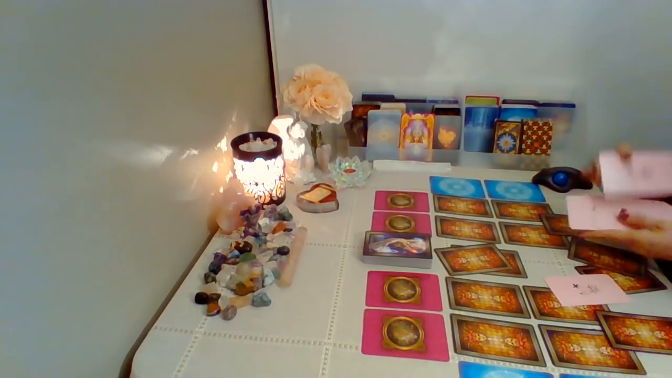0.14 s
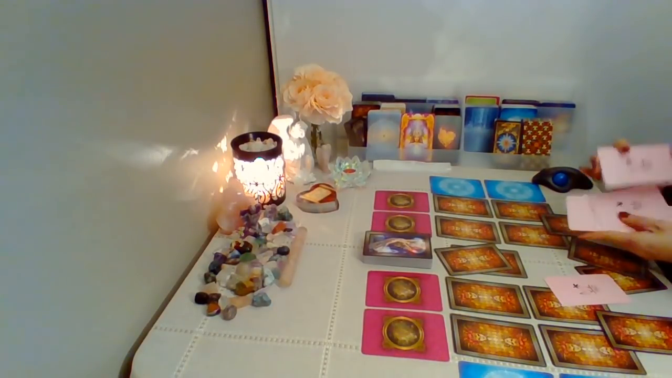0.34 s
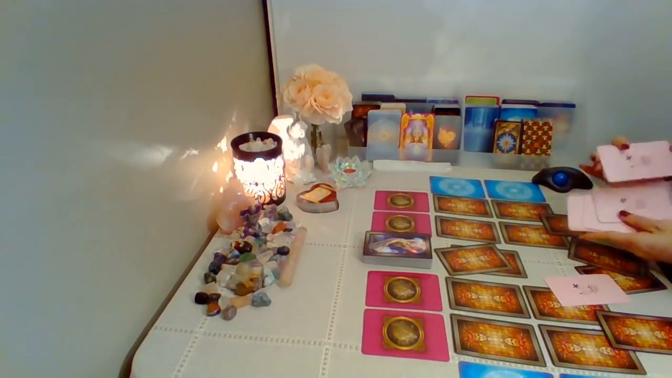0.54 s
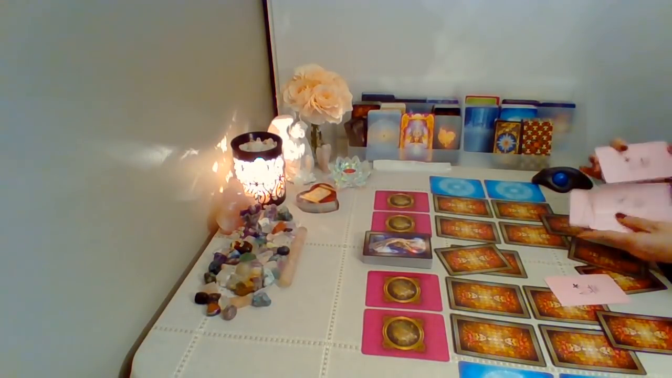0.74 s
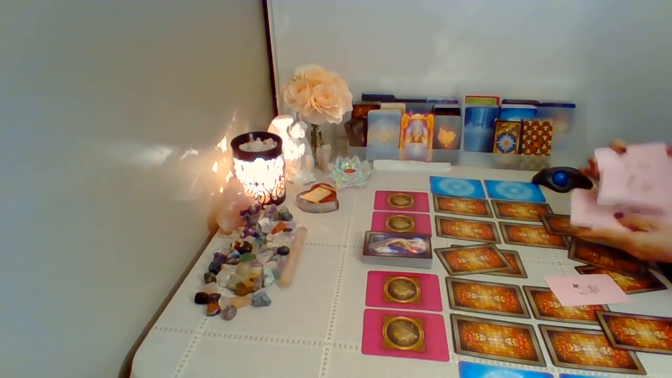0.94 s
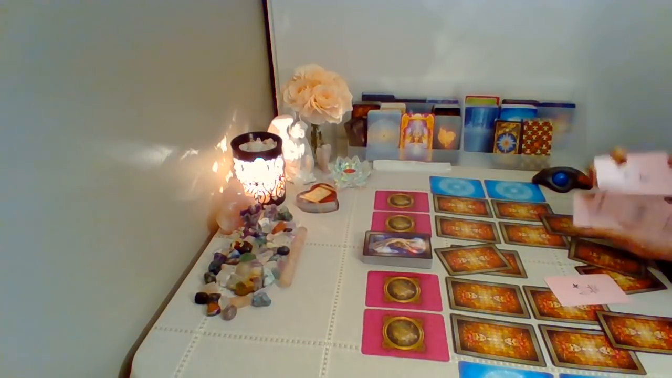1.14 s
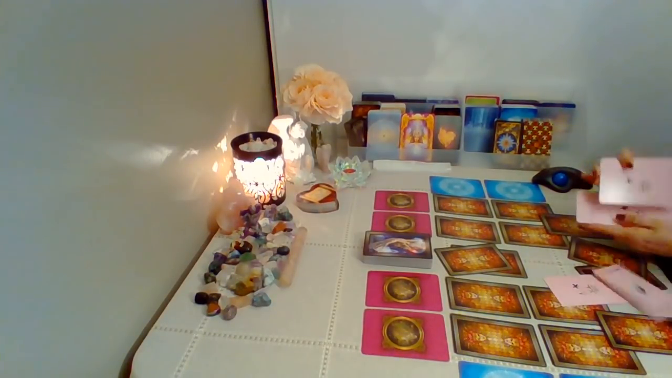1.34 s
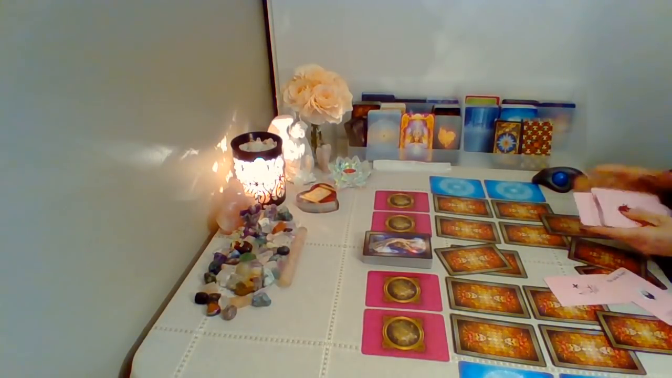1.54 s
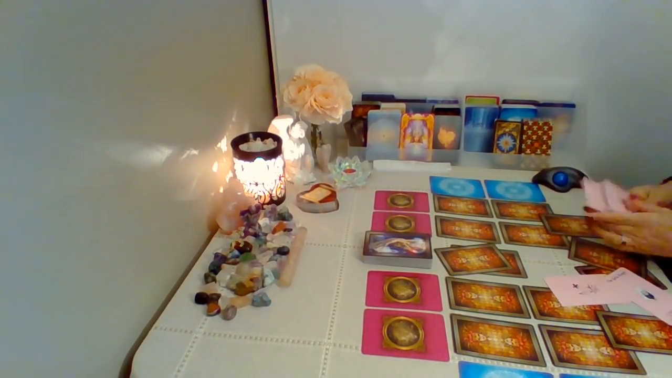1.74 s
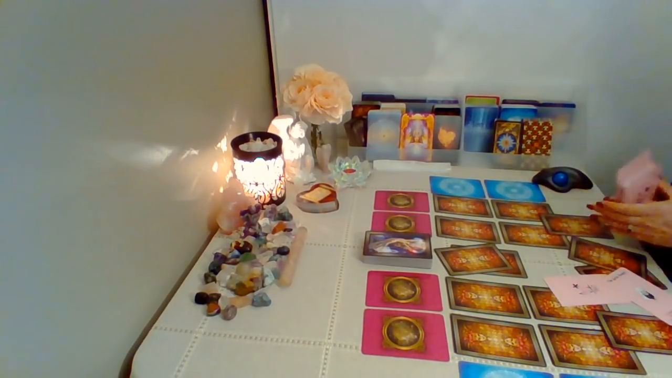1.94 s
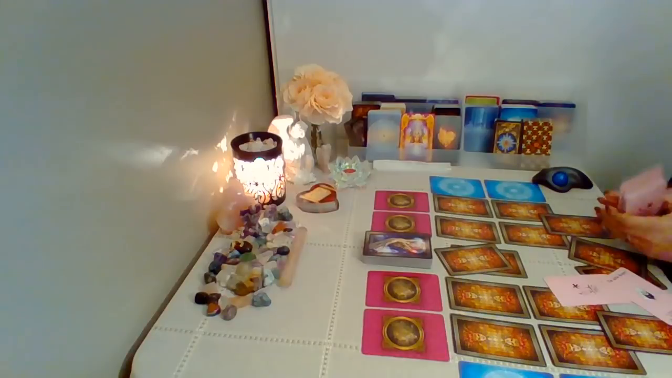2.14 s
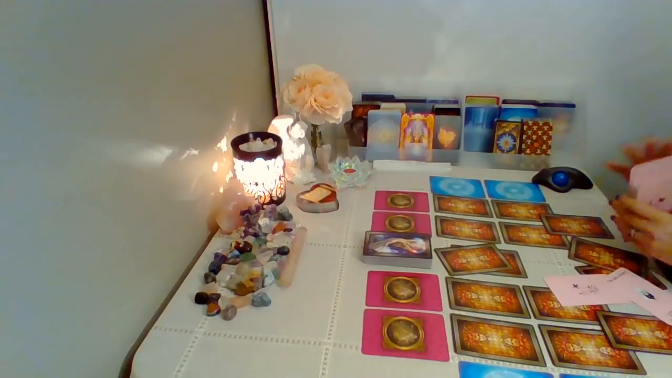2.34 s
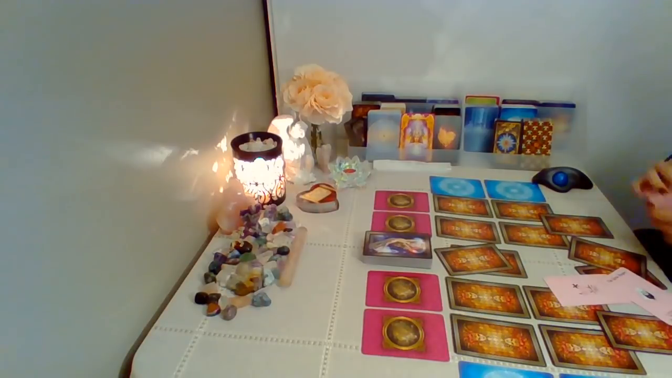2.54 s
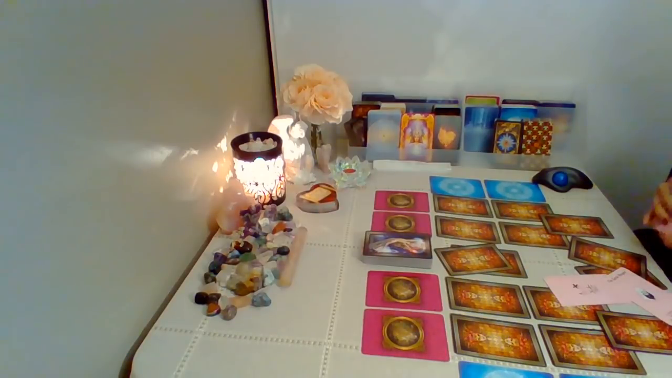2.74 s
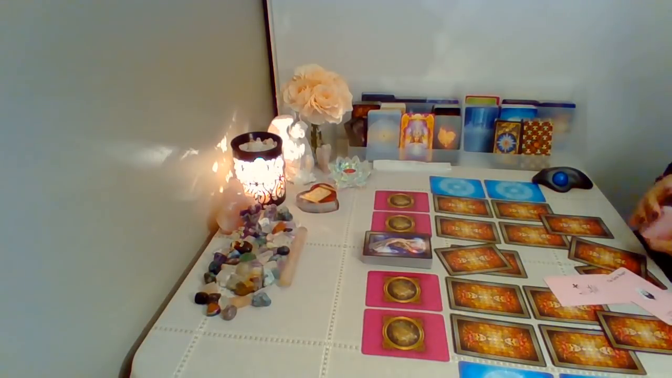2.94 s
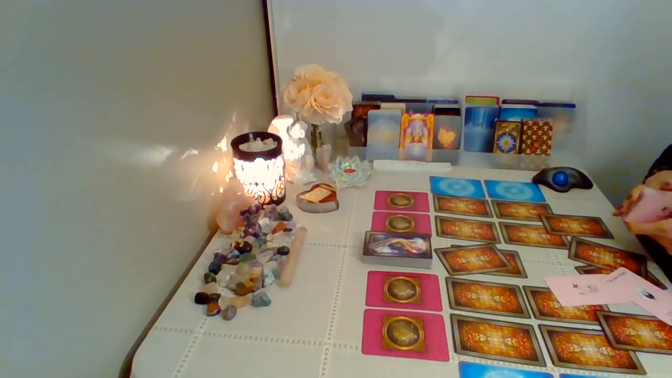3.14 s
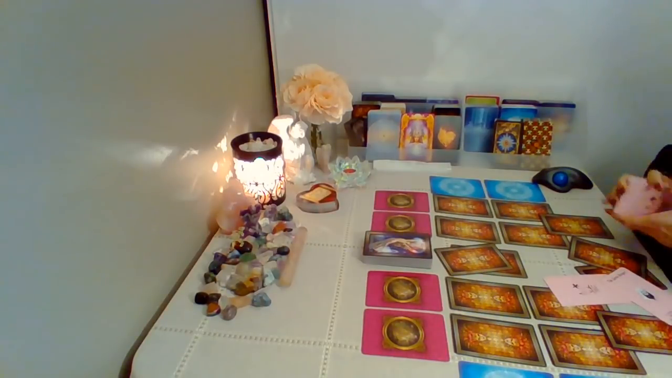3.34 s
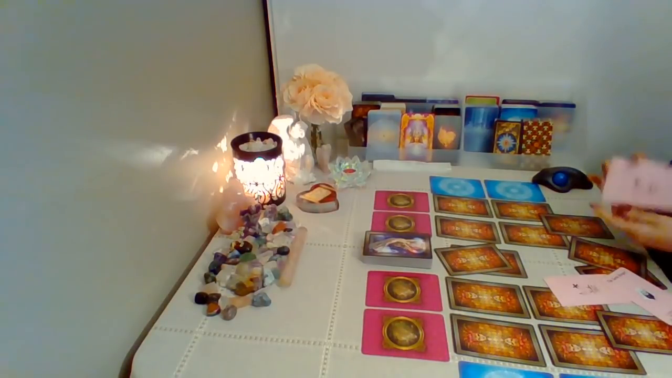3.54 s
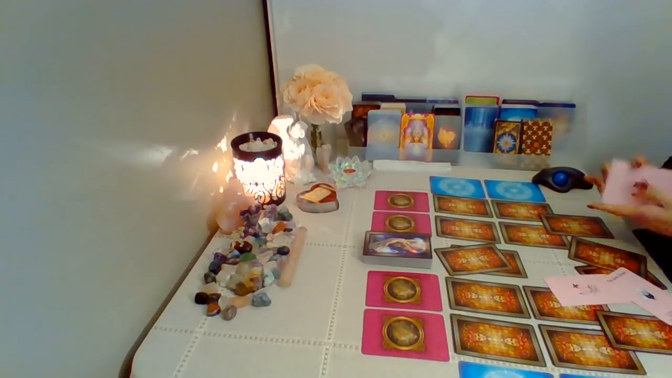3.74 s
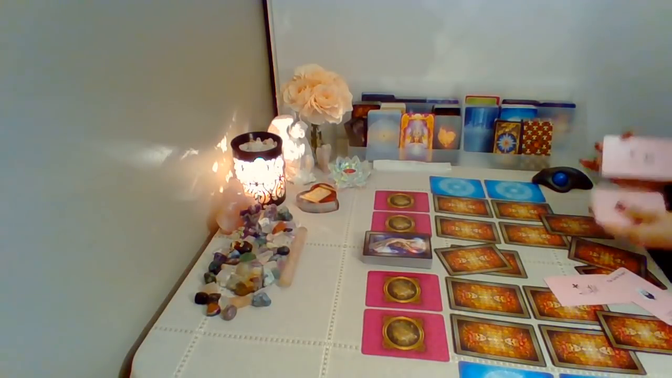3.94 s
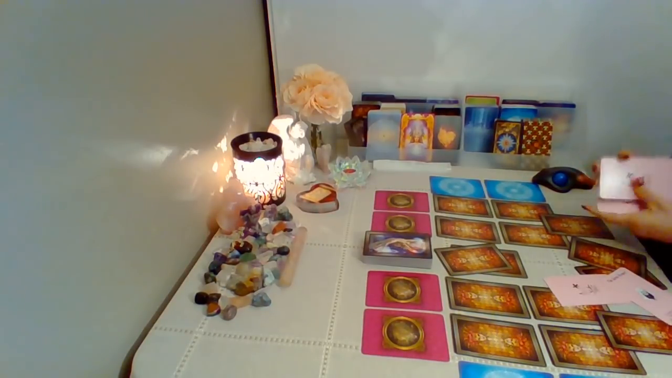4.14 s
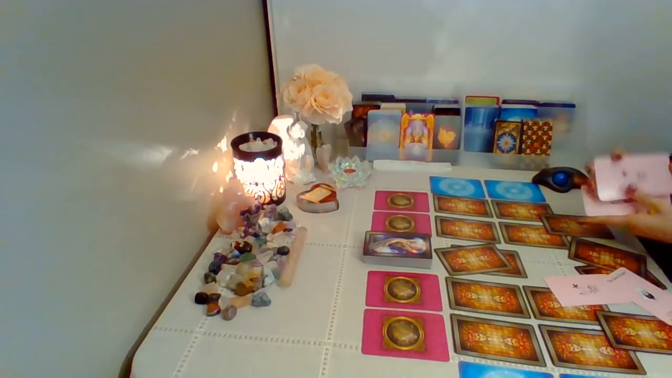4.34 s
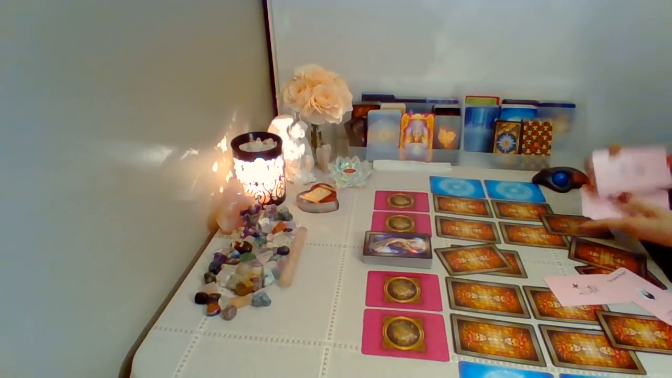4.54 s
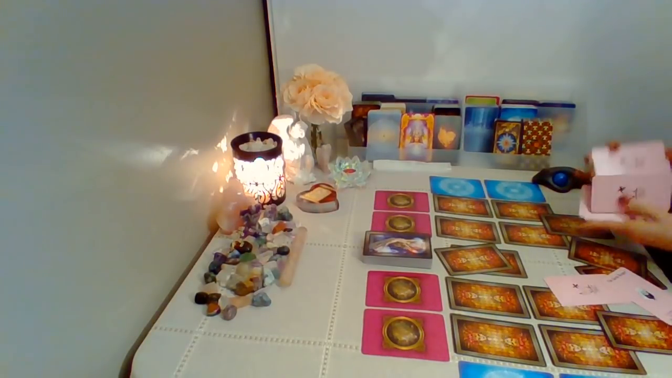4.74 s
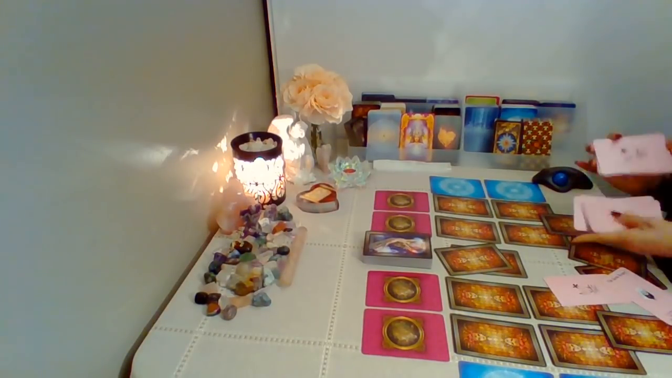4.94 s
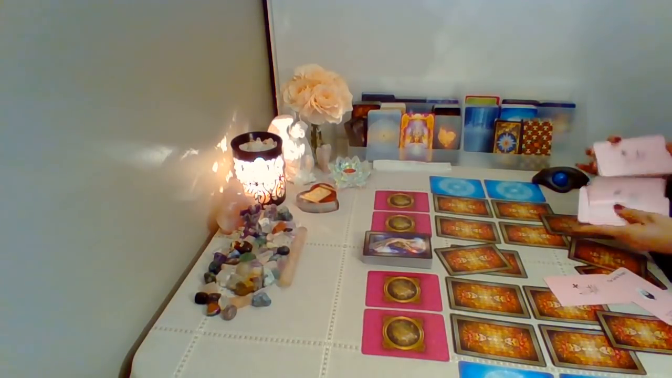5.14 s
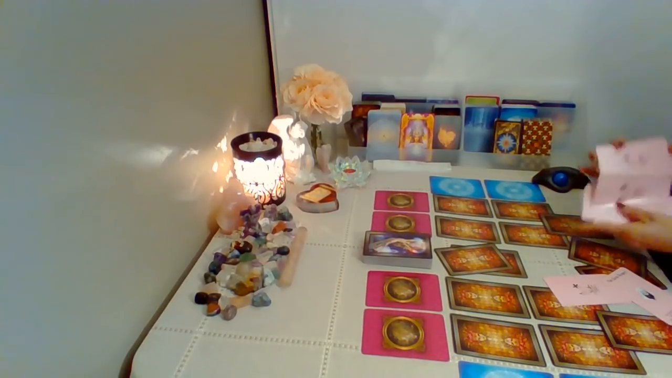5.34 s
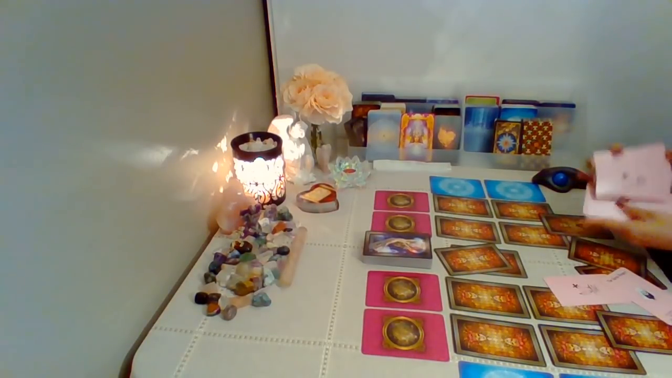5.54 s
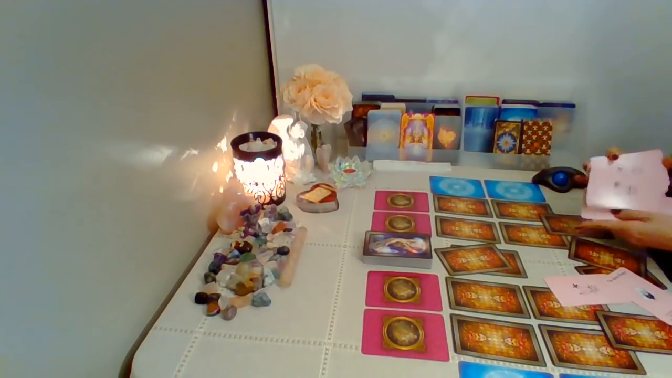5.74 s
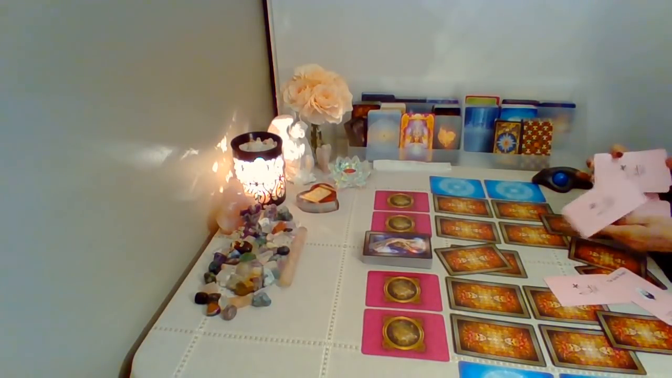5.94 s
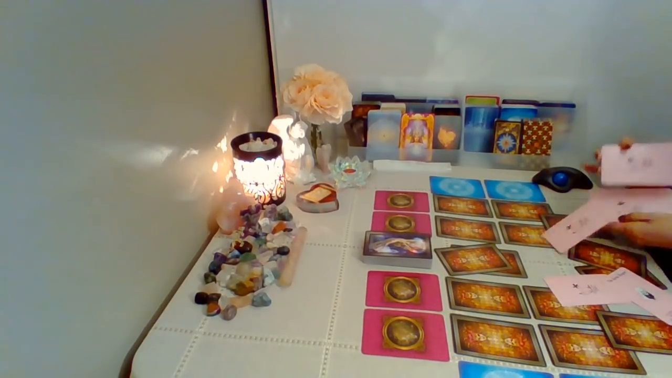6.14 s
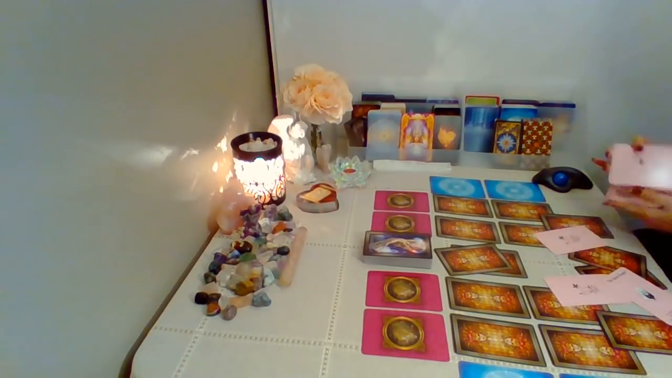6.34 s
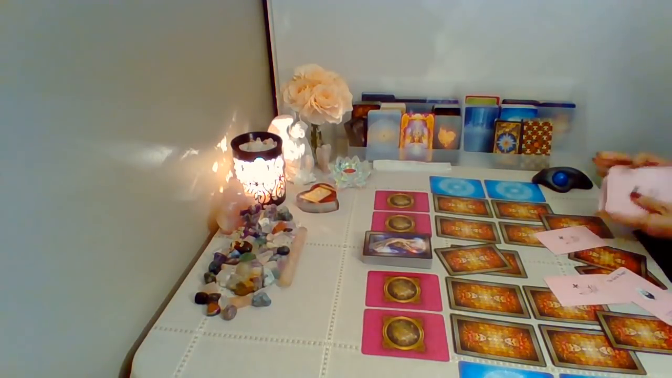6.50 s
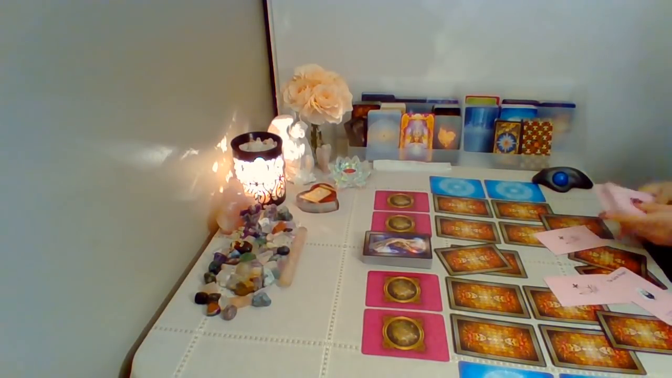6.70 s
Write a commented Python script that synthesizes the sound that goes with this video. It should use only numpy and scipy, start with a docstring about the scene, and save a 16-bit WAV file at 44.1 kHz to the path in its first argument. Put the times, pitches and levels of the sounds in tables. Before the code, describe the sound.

Hands shuffle a card deck indoors: swishing packets and crisp clacks, a faint rustling lull, a second quick run, then gentle card drops.

```python
"""An overhand shuffle of stiff glossy cards, heard at a table in a corner of a small room.
From first to last a soft room tone and a faint wavering hum lie behind, and a small fan, a drifting sine,
whines near the microphone. Packets slide off the deck with a hiss (shaped noise) and land with a tap
(struck resonances), briskly at first; a quieter middle follows, then a second brisk run that ends softly.
Loose cards drop on the table, fingers square the deck; a near wall echoes it all and a short tail follows."""
import sys
import numpy as np
from scipy import signal
from scipy.fft import rfft, irfft, next_fast_len
from scipy.io import wavfile
from scipy.ndimage import map_coordinates

SR = 44100
rng = np.random.default_rng(int(sys.argv[2]) if len(sys.argv) > 2 else 0)


def wrap_up_sound(samples):
    """Save the sound to the file named by the first command line argument, as 16-bit audio."""
    columns = np.atleast_2d(samples).T
    # keep every value between -1 and 1, then stretch to whole-number steps
    tamed = np.clip(columns, -1, 1)
    steps = np.round(tamed * 32767).astype(np.int16)
    wavfile.write(sys.argv[1], SR, steps)


N = 298557  # length in samples

# Room tone, relative spectrum. Each row: frequency in Hz, density in dB per Hz.
AIR_SPECTRUM = [(60, -24), (110, 5), (200, 1.5), (350, -4), (600, -7.5), (1700, -9.5), (3500, -13),
                (6000, -17.5), (8500, -20), (12000, -21), (16000, -24.5)]
AIR_DB = -72
# Low hum and rumble, relative spectrum. Each row: frequency in Hz, density in dB per Hz.
LOW_SPECTRUM = [(12, -39.0), (22, -1.5), (40, -12.0), (59, 6.5), (75, -16), (130, -18.0), (300, -48.5)]
# Swells of the low hum and rumble. Each row: time in seconds, level in dB.
RUMBLE_SWELLS = [(0.0, -73), (0.47, -69.5), (1.15, -78), (1.43, -64), (1.64, -77), (2.26, -69.5),
                 (2.51, -63), (2.88, -78.5), (3.26, -62), (4.02, -72.5), (4.39, -62), (4.64, -70.5),
                 (5.66, -72.5), (6.07, -63), (6.77, -73.5)]
# Drift of the fan's whine, before its random waver. Each row: time in seconds, pitch in Hz, level in dB.
FAN_DRIFT = [(0, 2150, -79), (1.2, 2148, -84), (1.5, 2160, -80), (1.9, 2170, -77), (2.5, 2141, -77.5),
             (3.0, 2161, -77), (3.4, 2152, -76.5), (3.9, 2150, -75), (4.9, 2150, -81.5), (5.6, 2164, -78),
             (6.0, 2183, -80), (6.77, 2141, -78)]

# Early echoes off the near surfaces. Each row: delay in ms, level in dB, spread in ms.
EARLY_ECHOES = [(4.377, -7, 0.27), (8.94, -6.5, 1.27), (14.288, -16, 2), (21.6, -16.5, 1.4),
                (28.222, -19, 2.8)]
# Decay of the room's tail. Each row: frequency in Hz, time to fall 60 dB in seconds.
TAIL_DECAY = [(150, 0.37), (1200, 0.42588), (4000, 0.33), (10000, 0.3)]
# Colour of the tail. Each row: frequency in Hz, gain in dB.
TAIL_COLOUR = [(150, 2), (1500, -5), (5000, -10.0), (12000, -29)]

# Strokes of card faces rubbing. Each row: time of full strength in seconds, hold in ms, hiss level in dB,
# lower rub level in dB, hiss rise in ms per 30 dB, hiss fall in ms per 30 dB.
STROKES = [(0.084, 22, -38, -48, 60, 45), (0.313, 28, -40.5, -43.5, 62, 50), (0.435, 9.7, -64, -74, 30, 35),
           (0.528, 12, -42, -48.5, 70, 75), (0.655, 10, -66, -68, 40, 60), (0.748, 20, -44.5, -47, 90, 70),
           (0.949, 20, -47.5, -48.5, 55, 55), (1.092, 15, -67, -67, 20, 60), (1.261, 10, -52, -44, 8, 94),
           (1.372, 50, -67, -73, 50, 100), (1.455, 26, -52, -55.5, 30, 100), (1.664, 22, -52, -61, 10, 80),
           (1.762, 40, -70.5, -71, 100, 47), (1.981, 9.5, -69, -79.5, 15, 160),
           (2.159, 18, -70, -76, 100, 70), (2.288, 20, -78.5, -83, 50, 50),
           (2.506, 13, -51.5, -59.5, 40, 48), (2.562, 91, -69.5, -71, 100, 100),
           (2.703, 20, -58, -67, 88, 70), (2.893, 20, -73, -75, 50, 70), (3.492, 55, -75, -82, 20, 100),
           (3.576, 10, -67, -74, 80, 50), (3.771, 17, -66, -71.5, 14, 80), (3.814, 76, -64.5, -76, 51, 100),
           (3.946, 24, -53, -54, 81, 55), (4.147, 25, -61, -59, 16, 100),
           (4.224, 25, -41.5, -45.5, 92, 45.5), (4.371, 15, -65, -68, 15, 99), (4.46, 20, -40, -45, 79, 63),
           (4.6, 14.9, -63.5, -68, 25, 79), (4.684, 24, -42.5, -45.5, 75, 50),
           (4.8, 20, -60, -62, 25.5, 100), (4.829, 12, -44.5, -51.5, 4, 60),
           (4.878, 32, -36.5, -46, 60, 59), (5.06, 23, -66, -71, 29, 60), (5.116, 18, -50, -61, 15.5, 100),
           (5.153, 20, -40.5, -41.5, 49.5, 43), (5.34, 20, -48, -68, 30, 98),
           (5.372, 18, -42, -39.5, 55, 74.5), (5.564, 18, -46.5, -49.5, 33, 39),
           (5.74, 15, -70, -73, 30, 42), (5.778, 9.3, -65, -66, 15, 30), (5.808, 28, -57.5, -64, 15, 18),
           (5.893, 10, -67, -76, 25, 30), (5.929, 15, -62, -75, 18, 60), (5.985, 9, -65, -73, 18, 40),
           (6.063, 6.7, -58, -54.5, 4, 37), (6.175, 9.1, -70, -72, 13, 30), (6.205, 19, -66, -62.5, 20, 70),
           (6.247, 15, -68, -71, 15, 90), (6.362, 12, -72.5, -72, 15, 60), (6.4, 36, -72, -74, 20, 81),
           (6.473, 35, -60.5, -59.5, 30, 61), (6.691, 60, -56, -60.5, 19, 60)]
# Relative spectra of the hiss and of the lower rub. Each row: frequency in Hz, density in dB per Hz.
HISS_SPECTRUM = [(1760, -43.5), (3000, -19.5), (5140, -3), (5800, -6.5), (8000, 3), (12100, -9),
                 (15000, -13), (16000, -12)]
RUB_SPECTRUM = [(250, -27.5), (700, -5.5), (1500, -7), (2300, -2.5), (3600, -3), (6000, -11), (9000, -28)]
RUB_STEEPER, RUB_LINGERS = 1.2123, 1.17  # the rub rises steeper and falls slower than the hiss, factors
SKIRT_DB, SKIRT_DB_PER_MS = -26, 0.1  # a faint rustle trails every stroke, and how fast it fades

# Contacts of card edges, part levels being peaks. Each row: time in seconds, snap level in dB, snap pitch
# in Hz, snap width as a share of its pitch, knock level in dB, knock pitch in Hz, knock width as a share
# of its pitch, thud level in dB, thud pitch in Hz, thump level in dB, tick level in dB, contact decay in ms.
CONTACTS = [(0.0595, -29.5, 2730, .71, -36, 1450, 0.36, -44, 503, -50.5, -41.5, 1.5),
            (0.0799, -25.5, 5882, .99, -51, 918, .55, -54, 523, -72.5, -31.5, 1.5),
            (0.1039, -32.5, 2850, 0.6287, -37.5, 1490, 0.52, -44, 610.7, -62, -28.5, 2.8),
            (0.2985, -34.5, 2680, .51, -38, 1648, .41, -52, 690, -57, -38.5, 1.5),
            (0.3116, -26.5, 2444, 0.47, -25, 1256, 0.52, -37, 503.3, -59.5, -30.5, 2.3),
            (0.3446, -22, 3270, 0.765, -41.5, 1570, 0.44, -51.5, 418.4, -62, -30, 1.6),
            (0.5317, -12, 2980, 0.51, -12.5, 1390, 0.62, -36, 404, -46, -28, 1.8),
            (0.7452, -40.5, 4160, 0.2286, -25.5, 1290, 0.83, -35, 576, -48, -28, 1.5),
            (0.9433, -34, 2400, 0.39, -38, 1340, 0.46, -44.5, 476, -47.5, -38, 1.2),
            (0.9635, -47.5, 3420, 0.637, -35, 1410, 0.54, -35, 607, -68, -37.5, 2.1),
            (1.0883, -41.5, 3420, 0.741, -41.5, 1688, 0.8614, -55, 573, -73, -46, 1.8),
            (1.2573, -39, 3608, 0.48, -26.5, 1200, 0.82, -30.5, 330.5, -38, -38, 3.7),
            (1.262, -22, 3000, 0.81, -23.5, 933, 0.39, -27.5, 524, -69, -26, 2.4),
            (1.3732, -40, 4300, .99, -44.5, 915, .56, -45.5, 665.1, -69, -28.5, 0.748),
            (1.4029, -32.5, 3934, .55, -62, 942, .59, -50, 560, -65, -35, 1.4),
            (1.5039, -57, 2580, 0.648, -35, 1226, 0.7, -44, 338, -60, -53, 0.51),
            (1.9771, -48, 4270, .55, -72, 1883, 0.572, -73, 518, -73.5, -45, 1.579),
            (2.509, -45.5, 3870, .7, -47.5, 1700, 0.4, -60.5, 498, -73, -44, 1.3),
            (2.618, -36.5, 4040, 0.7366, -63, 1990, .94, -67.5, 337, -71, -71, 4),
            (2.8874, -46, 3390, 0.2145, -79, 1910, 0.607, -67, 725.7, -74, -61.5, 5.665),
            (2.9133, -51, 3400, .19, -61, 1950, 0.587, -62, 586.9, -70, -55, 1.6),
            (3.486, -55, 3680, .93, -53, 1290, .81, -79.5, 474, -68, -46, 1.277),
            (3.5275, -58, 2820, .68, -53.5, 1360, 0.792, -71, 493, -81, -67, 1.6),
            (3.577, -40.5, 5200, 0.894, -52, 1634, .55, -64, 368.6, -74, -65, 1.998),
            (3.769, -49, 5150, 0.658, -55, 1592, 0.762, -76, 582, -70, -40.5, 2.598),
            (3.8103, -59, 5010, .55, -60, 1271, .47, -81, 638, -82.5, -52, 2.4),
            (3.9096, -56, 2900, .27, -48.5, 1160, 0.6447, -60, 400, -54, -54, 2.067),
            (3.957, -45, 4617, .55, -49, 1157, 0.37, -45.5, 380, -50, -36, 1.112),
            (3.9741, -33.5, 2927, 0.48, -36, 940, 0.4768, -48, 366.4, -58, -43, 2.372),
            (4.1433, -51, 2349, .55, -46, 2120, 0.29, -57, 471, -61, -46, 1.7),
            (4.162, -40.5, 3480, 0.48, -39.5, 1661, .68, -50, 340, -59, -47, 1.7),
            (4.2006, -37.5, 3130, .55, -42, 1620, 0.612, -48.5, 384.2, -71, -34, 1.5),
            (4.2237, -28, 2620, 0.5, -26.5, 1325, 0.59, -32.5, 566.1, -52.5, -24.5, 3.842),
            (4.2514, -38.5, 2703, .6, -30, 1350, 0.8, -38.5, 585, -54.5, -34, 1.3),
            (4.3688, -43.5, 2700, 0.7346, -46.5, 994.8, 0.5557, -73.5, 689, -76.5, -44, 1.5),
            (4.4582, -32.5, 4800, .45, -28.5, 1350, 0.4607, -36, 497, -46.5, -31, 3.864),
            (4.4944, -28, 4000, 0.617, -36.5, 1350, 0.65, -43, 507.2, -63, -38, 1.7),
            (4.6003, -46.5, 2418, 0.4466, -48.5, 1858, 0.5664, -57, 710, -84, -46, 2.1),
            (4.666, -33, 3770, .72, -43.5, 1530, 0.59, -60, 705, -57, -33, 2),
            (4.6858, -32, 3080, .64, -17, 1346, .99, -35.5, 714, -47, -34, 3.312),
            (4.6915, -20.5, 2659, 0.625, -28.5, 1445, .26, -32, 515, -54, -32, 3.9),
            (4.8292, -15, 4300, 1.4, -24.5, 1940, 1, -47.5, 338, -52, -20.5, 1.8),
            (4.854, -27.5, 4180, .55, -52, 1640, .55, -62, 476, -59, -45, 1.6),
            (4.903, -24.5, 3172, .39, -30.5, 1980, .43, -35, 350, -48, -29, 0.8746),
            (4.9071, -21, 4880, .55, -54, 1840, .49, -64, 567, -62.5, -38, 0.84),
            (4.9151, -28, 4645, 0.617, -35.5, 1056, 0.49, -43, 444, -62, -32, 0.963),
            (5.1249, -35, 3040, .75, -41, 1360, 0.65, -45, 332.9, -55, -36, 1.4),
            (5.1496, -21, 2702, 1.1, -16, 1516, 0.36, -29.5, 528.2, -44, -32, 4.3),
            (5.1845, -31, 3138, 0.88, -27, 1480, .99, -38, 524.2, -66, -42, 2.207),
            (5.3346, -42, 4080, 0.5, -51, 1650, .95, -60.5, 552, -73, -41.5, 3.7),
            (5.371, -24, 2650, 0.73, -15.5, 1310, 0.7527, -32, 465, -46.5, -30, 2.1),
            (5.5806, -29.5, 2700, .99, -27, 1667, 0.41, -38, 350, -51.5, -39.5, 2.5),
            (5.7797, -44, 5150, 0.6435, -53, 1650, 0.2083, -61, 409.4, -86.5, -54.5, 1.76),
            (5.9308, -41, 5668, .59, -76, 1630, .46, -67, 525.6, -75, -51, 2.397),
            (5.9803, -46.5, 5377, 0.547, -67, 1751, 0.659, -82, 710, -86, -48.5, 3.1),
            (6.0652, -41.5, 3211, .99, -53, 1040, .47, -37.5, 425, -38.5, -43, 1.6),
            (6.1502, -43, 3470, 0.5047, -70, 996, .55, -55, 364, -72, -50, 1.1),
            (6.2015, -52, 3200, .67, -54, 1624, .65, -55.5, 371.2, -62, -53, 2.7),
            (6.2533, -40, 3786, 0.29, -59, 1261, .35, -55.5, 355, -67, -48, 1.228),
            (6.3595, -45, 2603, 0.4952, -77, 1839, 0.599, -60, 347.3, -63, -49, 2.076),
            (6.4745, -50.5, 3020, .55, -45, 1395, 0.65, -50, 619, -67.5, -44, 2.975),
            (6.5837, -56, 4977, 0.356, -66, 1013, 0.51, -65, 657, -77, -45, 3.367)]
# Resonances, passed through twice: table top and palm, the deck either side of the packet's own note,
# thin card edge. Each row: pitch in Hz, width of one pass in Hz, level of one pass in dB.
TABLE_MODES = [(58.17, 14.926, -2.5), (122, 81, -0.5), (227.32, 114, -2)]
DECK_MODES = [(278, 121, -4), (763, 550, -6)]
EDGE_MODES = [(8432.4, 2900, 0), (13800, 5000, -9.5)]

TOP_HZ = 15900  # upper band limit of the microphone chain


def amp(db):
    """Decibels to amplitude."""
    return 10 ** (np.asarray(db) / 20)


def unit(x):
    """x scaled to rms 1."""
    return x / np.sqrt(np.mean(x ** 2) + 1e-20)


def along(points, hz):
    """Value at hz of (Hz, value) points joined on a log axis."""
    f, v = np.transpose(points)
    return np.interp(np.log(hz + 1), np.log(f + 1), v)


def curves(rows):
    """One value per sample for each column after the time."""
    s, *cols = np.transpose(rows)
    return [np.interp(np.arange(N) / SR, s, c) for c in cols]


def wobble(rate):
    """A smooth random curve, rate knots a second."""
    knots = rng.standard_normal(int(N * rate / SR) + 4)
    return map_coordinates(knots, [np.arange(N) * rate / SR])


def filtered(x, response):
    """x passed through a complex response of frequency."""
    m = next_fast_len(x.shape[-1] + 4096)
    spectrum = rfft(x, m) * response(np.fft.rfftfreq(m, 1 / SR))
    return irfft(spectrum, m)[..., :x.shape[-1]]


def modes(table):
    """Causal response of damped resonances, signs alternating."""
    def response(f):
        total = 0
        for k, (centre, width, db) in enumerate(table):
            resonance = 1j * f * width / (centre * centre - f * f + 1j * f * width)
            total = total + (-1) ** k * amp(db) * resonance
        return total
    return response


def noise(spectrum, grit_db=0.):
    """Coloured noise of rms 1; grit makes it catch and slip."""
    grit = amp(grit_db * (wobble(500) + .6 * wobble(90)))
    rough = rng.standard_normal(N) * grit
    return unit(filtered(rough, lambda hz: amp(along(spectrum, hz))))


def room_tone():
    """The air of the room: coloured noise whose level wanders slowly."""
    return amp(AIR_DB + 0.68 * wobble(2.9)) * noise(AIR_SPECTRUM)


def hum_and_rumble():
    """Low noise peaking near 22 and 59 Hz, which swells and sinks."""
    swell_db, = curves(RUMBLE_SWELLS)
    return amp(swell_db) * noise(LOW_SPECTRUM)


def fan_whine():
    """The small fan near the microphone: a thin sine wavering in pitch and level."""
    whine_hz, whine_db = curves(FAN_DRIFT)
    whine = np.sin(2 * np.pi * np.cumsum(whine_hz + 3 * wobble(6)) / SR)
    return amp(whine_db + 1.9 * wobble(16)) * whine


def room_answer(ms):
    """One impulse response: scattered early echoes and a tail in which treble dies first."""
    hz, t, z = signal.stft(rng.standard_normal(len(ms)), SR, nperseg=256)
    decay = amp(-60 * t / along(TAIL_DECAY, hz)[:, None])
    tail = signal.istft(z * decay, SR, nperseg=256)[1][:len(ms)]
    tail = filtered(tail / np.linalg.norm(tail), lambda hz: amp(along(TAIL_COLOUR, hz)))
    answer = np.roll(tail, 480)  # the tail starts about 11 ms late
    for late, db, spread in EARLY_ECHOES:  # clutter on table and shelf breaks up each echo
        echo = rng.standard_normal(len(ms)) * np.exp(-((ms - late) / spread) ** 2)
        answer += amp(db) * echo / np.linalg.norm(echo)
    return answer


def room(x):
    """Direct sound plus scattered echoes and tail, drawn anew every eighth of a second."""
    wet, hop = np.zeros(N + SR), SR // 8
    ms = np.arange(SR // 2) * 1000 / SR
    for a in range(0, N, hop):
        piece = signal.fftconvolve(x[a:a + hop], room_answer(ms))
        wet[a:][:len(piece)] += piece
    return x + wet[:N]


def slides():
    """Card faces rub: a bright hiss over a lower, gritty rub; each stroke swells, holds and dies away."""
    hiss, rub = np.zeros(N), np.zeros(N)
    for s, hold_ms, hiss_db, rub_db, rise_ms, fall_ms in STROKES:
        near = slice(max(round(s * SR) - SR // 3, 0), round(s * SR) + SR // 2)
        ms = (np.arange(N)[near] / SR - s) * 1000
        early, late = np.maximum(-ms, 0), np.maximum(ms - hold_ms, 0)
        rise_db, fall_db = -30 * early / rise_ms, -30 * late / fall_ms
        skirt = amp(SKIRT_DB - SKIRT_DB_PER_MS * late)
        hiss[near] += amp(hiss_db + rise_db) * (amp(fall_db) + skirt)
        rub[near] += amp(rub_db + RUB_STEEPER * rise_db) * (amp(fall_db / RUB_LINGERS) + skirt)
    return hiss * noise(HISS_SPECTRUM, grit_db=4.0) + rub * noise(RUB_SPECTRUM, grit_db=3.5)


def taps():
    """Each contact rings table and deck: thump, thud, hollow knock between packets, snap and tick."""
    out, t = np.zeros(N + SR), np.arange(2048) / SR
    ragged = rng.standard_normal((len(CONTACTS), len(t)))
    blow = 1. * (t == 0)  # a single impulse
    for row, jag in zip(CONTACTS, ragged):
        (s, snap_db, snap_hz, snap_width, knock_db, knock_hz, knock_width,
         thud_db, thud_hz, thump_db, tick_db, contact_ms) = row
        scrape = jag * np.exp(-1000 * t / contact_ms)  # edges arrive one after another
        scrape = scrape / np.linalg.norm(scrape)
        soft = blow + 1.3 * scrape  # the knock is driven with less scrape than snap and tick
        edge = blow + 1.82 * scrape
        thud = [DECK_MODES[0], (thud_hz, 0.37 * thud_hz, 0), DECK_MODES[1]]
        knock = [(knock_hz, knock_width * knock_hz, 0)]
        snap = [(snap_hz, snap_width * snap_hz, 0)]
        parts = [(blow, TABLE_MODES, thump_db), (blow, thud, thud_db), (soft, knock, knock_db),
                 (edge, snap, snap_db), (edge, EDGE_MODES, tick_db)]
        for push, table, db in parts:
            ring = filtered(filtered(push, modes(table)), modes(table))  # twice: steep flanks
            out[round(s * SR):][:len(t)] += amp(db) * ring / np.abs(ring).max()
    return out[:N]


def scene():
    """The shuffle heard in its room, over the background, as one channel."""
    background = room_tone() + hum_and_rumble() + fan_whine()
    shuffle = taps() + slides()
    return (room(shuffle) + background)[None]


def record(dry):
    """The microphone chain keeps nothing above its band limit."""
    return filtered(dry, lambda hz: hz < TOP_HZ)


dry = scene()
out = record(dry)
wrap_up_sound(out)
```